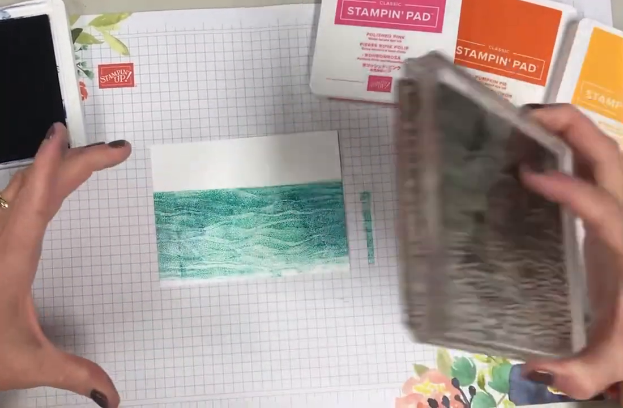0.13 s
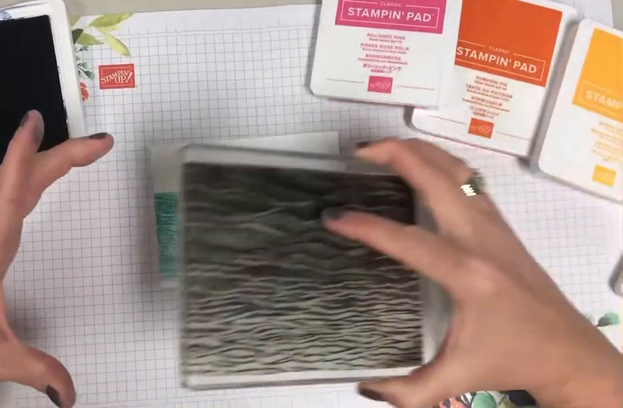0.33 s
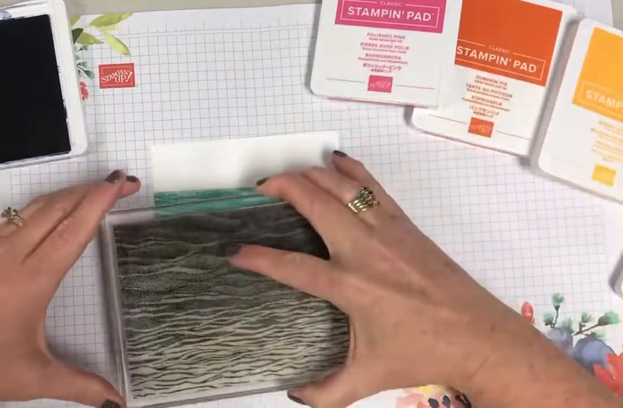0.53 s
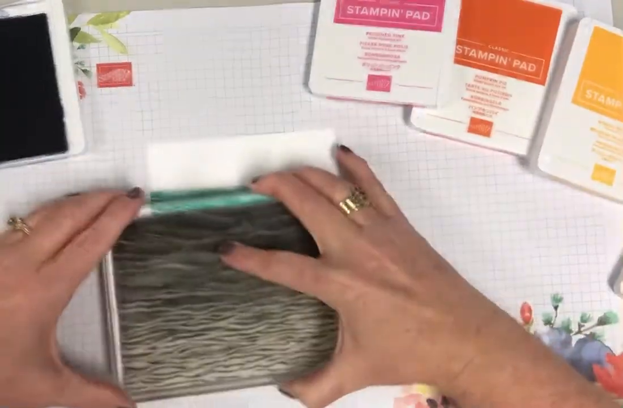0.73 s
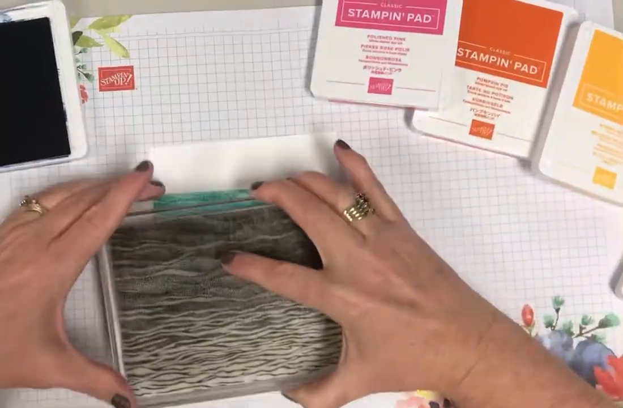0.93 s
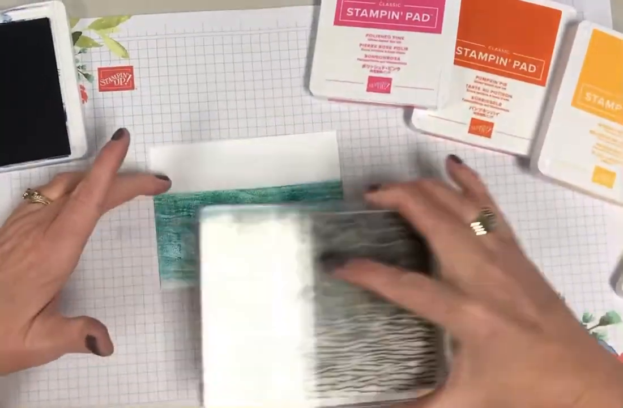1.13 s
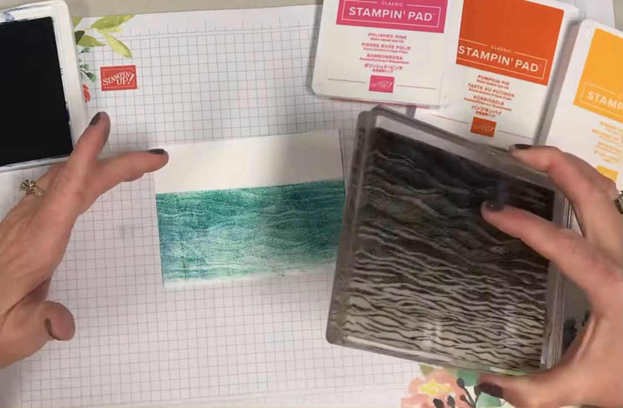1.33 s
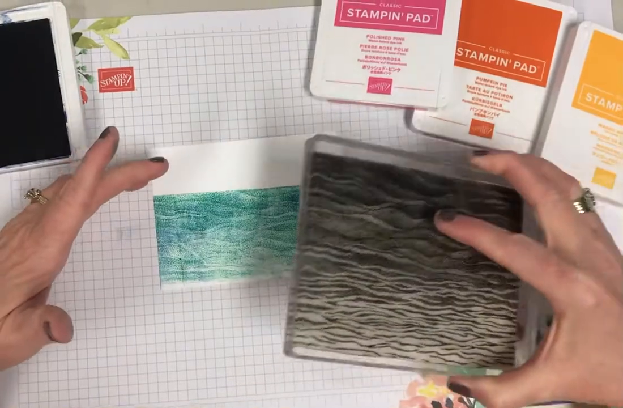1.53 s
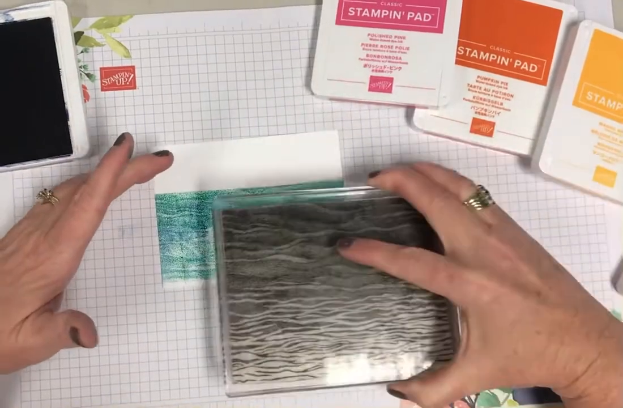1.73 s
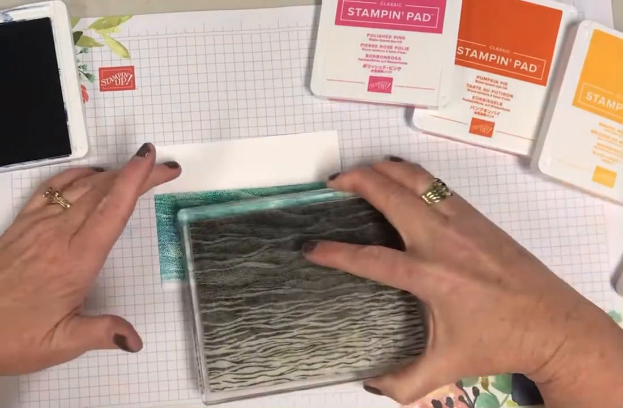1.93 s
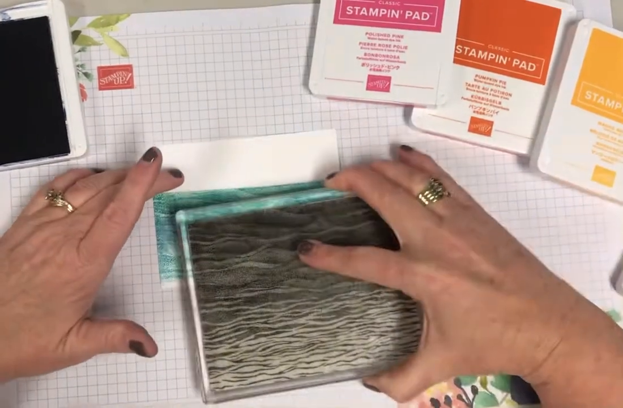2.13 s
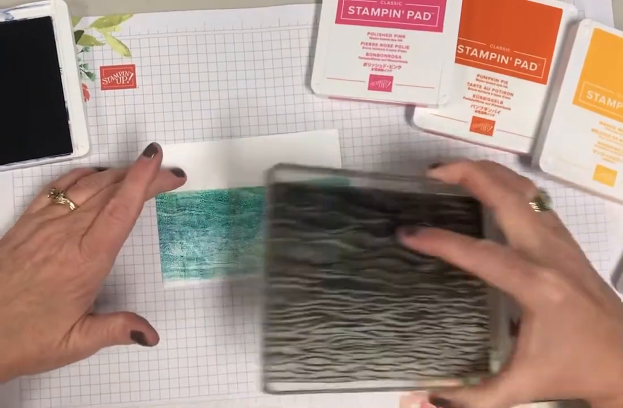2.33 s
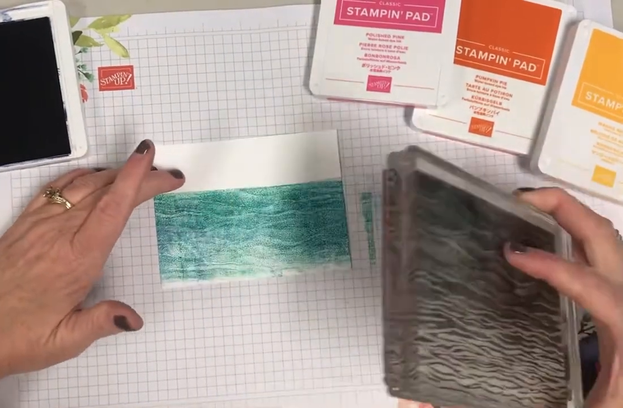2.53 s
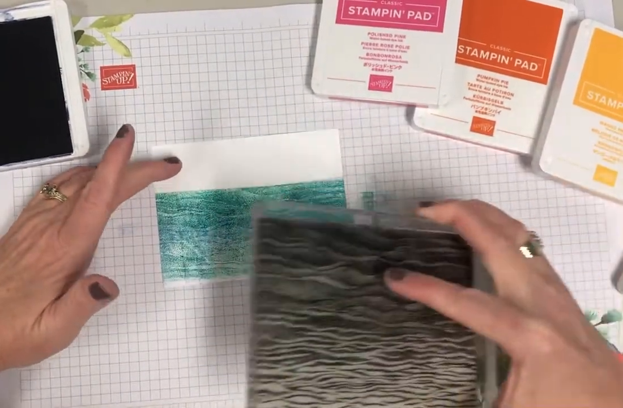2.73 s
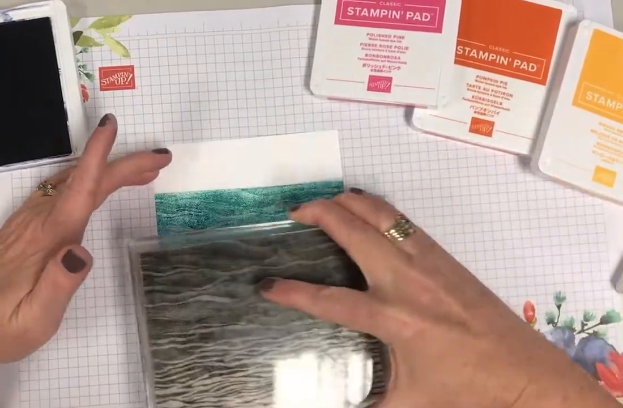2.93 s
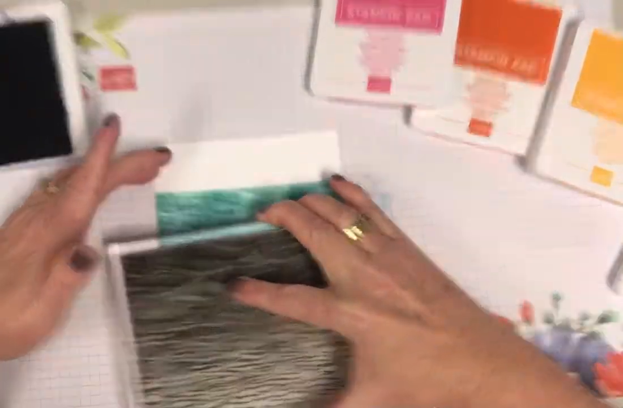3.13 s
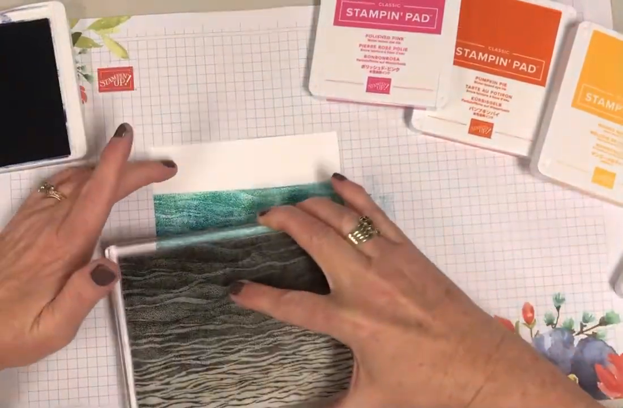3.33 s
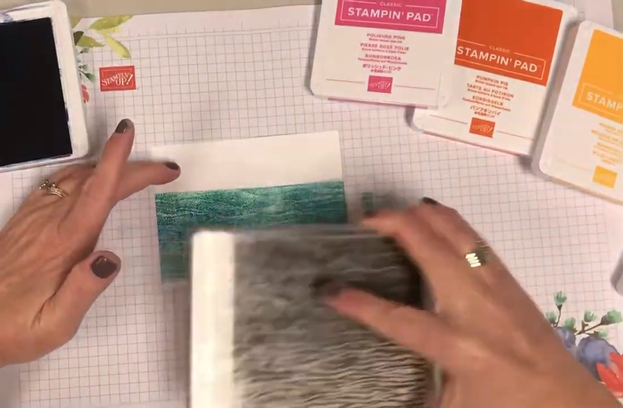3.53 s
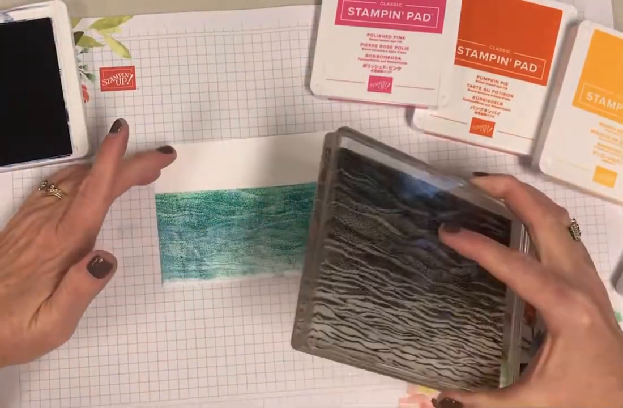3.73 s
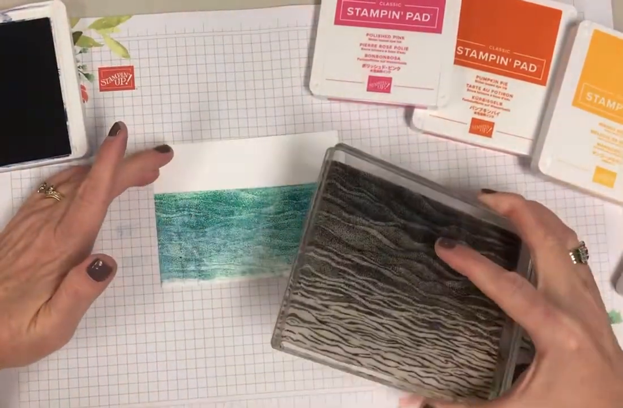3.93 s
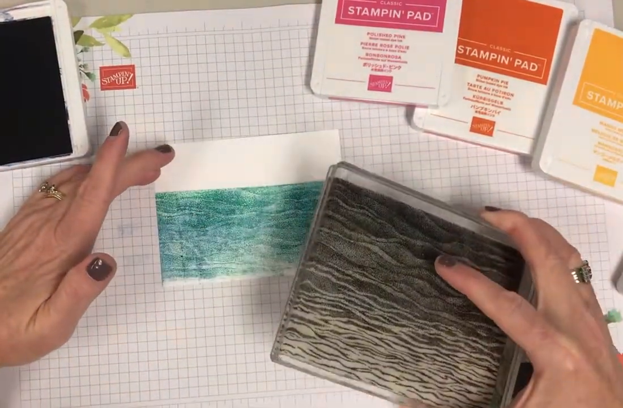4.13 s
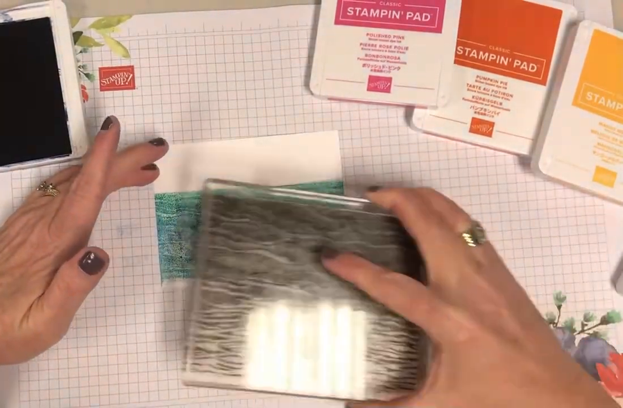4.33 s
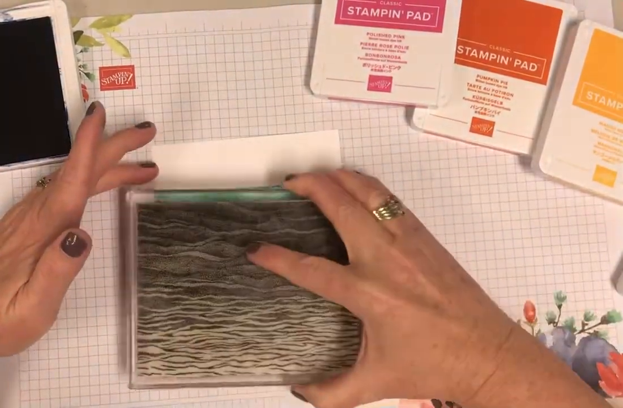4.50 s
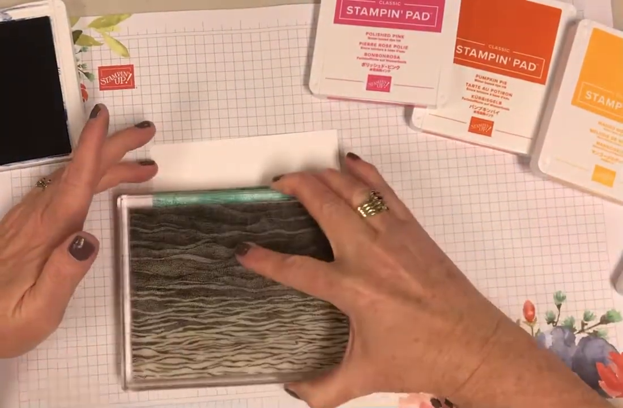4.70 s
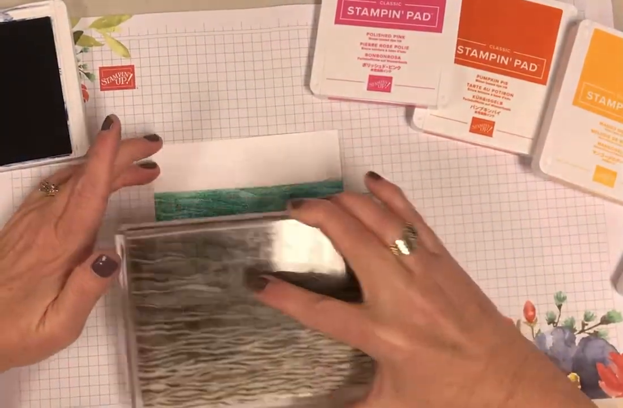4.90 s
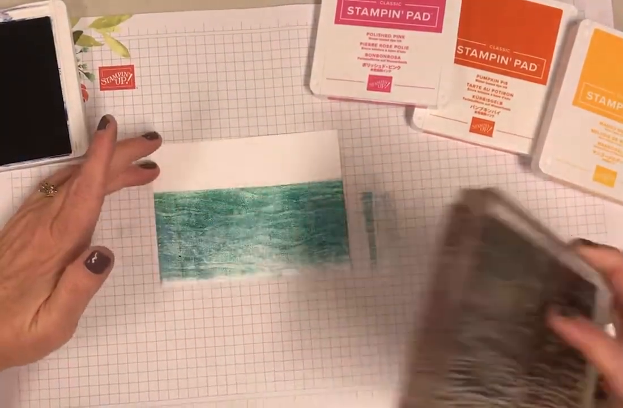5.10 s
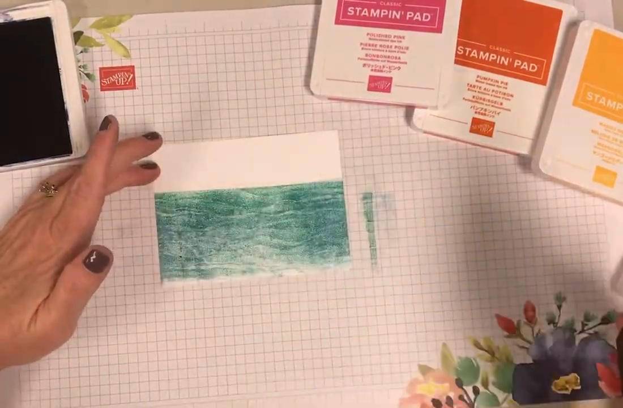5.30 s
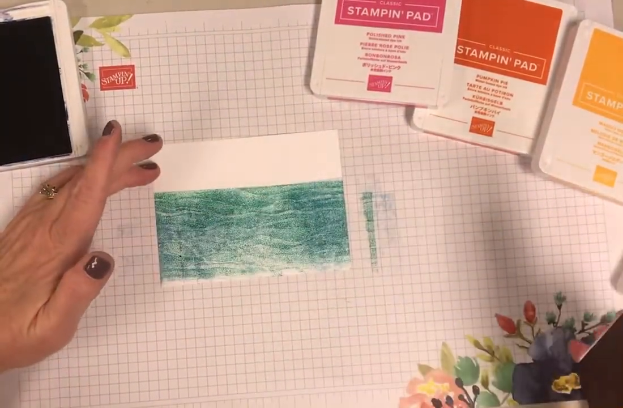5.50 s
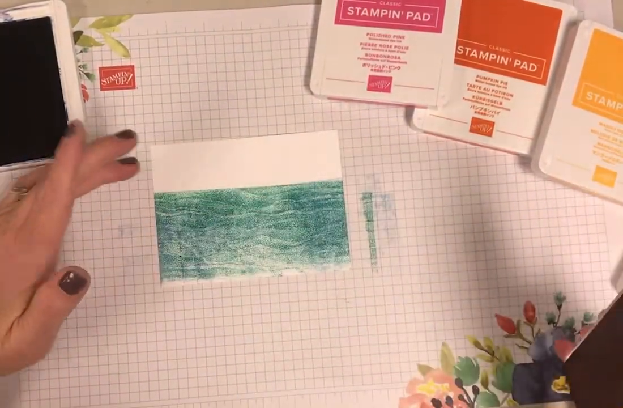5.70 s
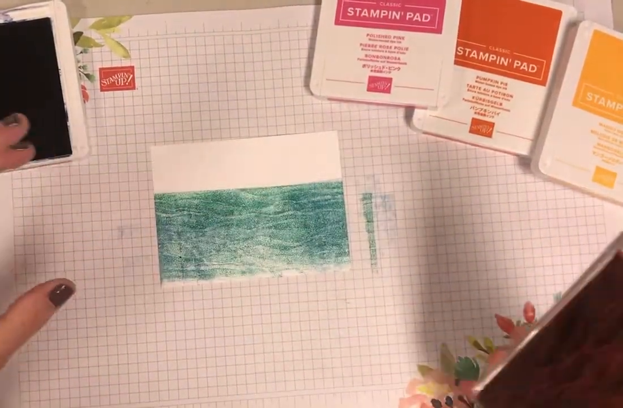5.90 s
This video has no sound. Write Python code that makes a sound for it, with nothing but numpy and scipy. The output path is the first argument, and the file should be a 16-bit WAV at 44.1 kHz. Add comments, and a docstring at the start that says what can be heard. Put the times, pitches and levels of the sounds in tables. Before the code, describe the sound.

A large acrylic block with a rubber stamp thuds onto paper on a craft table four times, with soft brushing and a final sharp click.

```python
"""A large acrylic block with a rubber stamp lands four times on paper on a crafting table, in a small room.
Each time an edge hits and the face comes down flat: soft pulses ring the tabletop's modes as a thud,
and grainy noise rings the block's modes as a clack. Hands and rubber brush the paper in swells of hiss with a
dull rumble below; damped modes make the block tick in the grip and, at the end, click sharply.
Quiet room air and a fading low drone lie underneath."""
import sys
import numpy as np
from scipy import signal
from scipy.fft import rfft, irfft, next_fast_len
from scipy.io import wavfile
from scipy.ndimage import map_coordinates

SR = 44100
rng = np.random.default_rng(int(sys.argv[2]) if len(sys.argv) > 2 else 0)


def unload_wav(signal):
    """Save mono or channel-first audio to the path in sys.argv[1] as 16-bit WAV at rate SR, clipped to [-1, 1]."""
    wavfile.write(
        sys.argv[1],
        SR,
        np.round(np.clip(np.atleast_2d(signal).T, -1, 1) * 32767).astype(np.int16),
    )


N = 267025
TIME = np.arange(N) / SR  # seconds

# room air: (frequency [Hz], relative density [dB per Hz])
AIR_SPECTRUM = [(20, -44), (33, -26), (45, -13.5), (62, 0.5), (88, -6), (138, -5), (204, -11.5), (328, -14),
                (500, -18.5), (800, -21.5), (1100, -18), (2000, -25), (5000, -30.7), (10500, -36),
                (15000, -35.5)]
# small hard ticks: (time [s], level [dB], lowest mode [Hz], brightness [dB per octave])
TICK_EVENTS = [(.2727, -48.5, 2940, 6.5), (2.5302, -42, 1290, -1), (4.617, -43, 1050, -9),
               (5.013, -47, 1030, -15), (5.931, -66, 3000, 11), (6.0078, -21, 3130, -1)]
# modes of a tick: (multiple of the lowest mode [ratio], Q [ratio], level [dB])
TICK_MODES = [(1, 10.5, -3.5), (1.35, 4.7, -2.5), (2.0, 4.6, -5), (2.8, 5.5, -8.5), (4.4, 6.9, -11)]
# hand and rubber slide over the paper: (time of the middle [s], level [dB], half length [s])
SLIDES = [(.387, -61, .13), (.89, -60, .085), (.99, -62, .025), (1.12, -59, .036), (1.19, -56.7, .12),
          (2.368, -65.3, .12), (3.5, -64, .11), (4.365, -68.7, .11), (4.96, -68.5, .072), (5.73, -73, .31)]
# sliding on paper: (frequency [Hz], relative density [dB per Hz])
PAPER_SPECTRUM = [(150, -22), (700, -1), (1800, -2.5), (3000, 4), (5000, -1), (7500, -5.5), (9500, -4),
                  (10400, -14), (12000, -3.5), (16000, -12.5)]
# low bumps with a short scuff: (time [s], bump level [dB], scuff level [dB])
BUMPS = [(.698, -40, -48), (.786, -48, -47.5), (.886, -60, -53.5), (.998, -49.5, -55), (1.944, -50, -58),
         (2.189, -50.5, -56), (2.531, -68, -67), (3.307, -50, -53), (4.79, -60, -58.5)]
# dull rumble of the tabletop: (frequency [Hz], relative density [dB per Hz])
RUMBLE_SPECTRUM = [(30, -17), (50, -4.5), (100, 1), (150, -4.5), (260, -7), (400, -9.5), (540, -19.5),
                   (900, -31.5), (2000, -54.5)]
# the block lands: (graze time [s], graze level [dB], edge hit time [s], edge level [dB],
# face flat time [s], face level [dB], rubber slap time [s], slap level [dB], slap rise [s], slap t60 [s])
LANDINGS = [(.659, -48.5, .6531, -26, .6839, -23.5, .686, -41.5, .016, .09),
            (1.961, -40.5, 1.9647, -11.5, 1.9852, -19, 1.984, -28, .009, .06),
            (3.110, -35, 3.1172, -7.8, 3.1362, -21.5, 3.1215, -21.7, .0008, .03),
            (4.583, -47.5, 4.5931, -31, 4.6172, -29, 4.601, -51.5, .005, .04)]
# modes of the tabletop: (frequency [Hz], width [Hz], level [dB])
TABLETOP_MODES = [(45, 9, -5.5), (94.5, 16, 5.5), (108.4, 9.2, -1.5), (153, 36, 0), (196.5, 12, -5.5),
                  (251, 10, -4.5), (296, 20, 0), (382.4, 14, -2.5), (540, 14, -4), (660, 34, -4)]
# rubber slapping on paper: (frequency [Hz], relative density [dB per Hz])
SLAP_SPECTRUM = [(60, -10), (250, 4), (470, 2.5), (800, 2.5), (1300, -2), (2100, -7), (3100, -7),
                 (4600, -14.5), (6000, -16), (7600, -25), (9500, -22.5), (10500, -31), (12000, -27),
                 (16000, -36.5)]
# modes of the acrylic block: (frequency [Hz], width [Hz], level [dB])
BLOCK_MODES = [(1018, 35, -7), (1195, 35, -6), (1398, 35, -6), (1680, 45, -3.5), (2760, 120, -4.5),
               (3000, 40, -5), (3195, 30, -1), (3360, 250, -7), (3900, 500, -14), (9160, 858, -11.5)]
# decay of the room: (frequency [Hz], t60 [s])
ROOM_DECAY = [(60, 0.536), (120, 0.66), (380, 0.57), (1000, 0.52), (3000, 0.61), (6000, 0.584),
              (12000, 0.73)]

DRONE_HZ, DRONE_DB = 49, -62
DRONE_FADE_START_S, DRONE_FADE_DB_PER_S = 2.3, 25
DRAG_DB = -7  # a slide also rumbles in the table; relative to its hiss
BUMP_LAG_S, BUMP_HALF_S = .012, .03  # a bump is a soft swell that peaks just after its scuff
RUMBLE_DB, RUMBLE_T60_S = -20, .62  # rumble that dies away after a landing; relative to the face
PUSH_HZ, PUSH_DB_PER_OCTAVE = 325, 26  # pitch of a 0 dB push, the face apart; softer ones are longer and lower
FACE_HZ = 68  # pitch of the push of the broad face
TABLE_PERIOD_S = .0112  # further low pushes, one table period before and after the face
BEFORE_DB, AFTER_DB = 2, .5  # those two pushes, relative to the face
CLACK_DB = -6  # a clack comes with the push before the face; relative to the slap
FLATTEN_DB, FLATTEN_DULL_DB = -9, -1.5  # ridges flatten under the face: relative to the slap, and dB per octave
AFTER_HISS_LAG_S, AFTER_HISS_DB = .075, -24.5  # a faint bright hiss swells shortly after the slap; relative to it
TOP_HZ = 15850  # band limit of the microphone


def amp(db):
    """Decibels to gain."""
    return 10 ** (np.asarray(db) / 20)


def unit(x):
    """Scale to rms 1."""
    return x / np.sqrt(np.mean(x ** 2) + 1e-20)


def along(points, hz):
    """Read a curve of (Hz, value) points on a log frequency axis."""
    f, values = np.transpose(points)
    return np.interp(np.log(hz + 1), np.log(f + 1), values)


def filtered(x, response):
    """Shape x with a complex response of frequency."""
    size = next_fast_len(N + SR // 4, real=True)
    spectrum = rfft(x, size) * response(np.fft.rfftfreq(size, 1 / SR))
    return irfft(spectrum, size)[:N]


def resonances(modes, f):
    """Causal response of a body that rings in (Hz, width Hz, dB) modes."""
    total = 0
    for hz, width, db in modes:
        damping = 1j * f * width
        total = total + amp(db) * damping / (hz * hz - f * f + damping)
    return total


def noise(spectrum):
    """Coloured noise of rms 1."""
    white = rng.standard_normal(N)
    return unit(filtered(white, lambda f: amp(along(spectrum, f))))


def wobble(rate):
    """A smooth random curve with rate knots a second."""
    knots = rng.standard_normal(int(N * rate / SR) + 4)
    return map_coordinates(knots, [TIME * rate])


def swells(rows):
    """Smooth rises and falls of gain from (s, dB, half length s) rows, summed as power."""
    power = 0
    for s, db, half in rows:
        power = power + amp(db) ** 2 * np.exp(-np.minimum(2 * ((TIME - s) / half) ** 2, 20))
    return np.sqrt(power)


def background():
    """Quiet room air, never quite steady, with a low drone that fades away."""
    air = amp(-64.5 + 0.23 * wobble(5.9)) * noise(AIR_SPECTRUM)
    drone = np.sqrt(2) * np.sin(2 * np.pi * DRONE_HZ * TIME + .3 * wobble(18))
    drone_db = DRONE_DB - DRONE_FADE_DB_PER_S * np.maximum(TIME - DRONE_FADE_START_S, 0)
    return air + amp(drone_db) * drone


def ticks(rebound_cycles=5, rebound_db=-6):
    """A hard contact rings for a few cycles, damped by the hand, and chatters once in step with its lowest mode."""
    out = np.zeros(N + SR)
    t = np.arange(SR // 30) / SR
    for s, db, hz, brightness in TICK_EVENTS:
        # little radiates below the lowest mode
        below_modes = signal.butter(6, .85 * hz, "high", fs=SR, output="sos")
        for lag, loss_db in [(0, 0), (rebound_cycles, rebound_db)]:
            cycles = np.maximum(hz * t - lag, 0)
            ring = np.zeros(len(t))
            for multiple, q, level in TICK_MODES:
                decay = np.exp(-np.pi * multiple * cycles / q)
                gain = amp(level + brightness * np.log2(multiple))
                ring += gain * np.sin(2 * np.pi * multiple * cycles) * decay
            out[round(s * SR):][:len(t)] += amp(db + loss_db) * signal.sosfilt(below_modes, ring)
    return out[:N]


def brushing(flutter_db=1.4):
    """Skin and rubber slide over the paper with a soft, fluttering hiss that swells and fades with their speed."""
    return swells(SLIDES) * amp(flutter_db * wobble(60)) * noise(PAPER_SPECTRUM)


def rumbling(rise=.012):
    """The tabletop rumbles dully after landings, at bumps and along slides: low noise under smooth envelopes."""
    bumps = swells([(s + BUMP_LAG_S, bump_db, BUMP_HALF_S) for s, bump_db, _ in BUMPS])
    force = np.hypot(bumps, amp(DRAG_DB) * swells(SLIDES))
    for _, _, _, _, face_s, face_db, *_ in LANDINGS:
        t = TIME - face_s
        after_db = face_db + RUMBLE_DB - 60 * np.maximum(t, 0) / RUMBLE_T60_S
        after_landing = amp(after_db) * np.exp(np.minimum(t, 0) / rise)
        force = np.hypot(force, after_landing)
    return force * noise(RUMBLE_SPECTRUM)


def blows():
    """The edge hit, then the face with a low push before and after it: rows of (s, dB, pitch of the push Hz)."""
    for _, _, edge_s, edge_db, face_s, face_db, *_ in LANDINGS:
        edge = (edge_s, edge_db)
        before_face = (face_s - TABLE_PERIOD_S, face_db + BEFORE_DB)
        after_face = (face_s + TABLE_PERIOD_S, face_db + AFTER_DB)
        for s, db in [edge, before_face, after_face]:
            yield s, db, PUSH_HZ * 2 ** (db / PUSH_DB_PER_OCTAVE)
        yield face_s, face_db, FACE_HZ


def thuds():
    """Each cushioned blow pushes the air out and back once, and sets the tabletop ringing."""
    push = np.zeros(N)
    for s, db, hz in blows():
        phase = 2 * np.pi * hz * (TIME - s)
        near = np.abs(phase) < 2 * np.pi
        push[near] -= amp(db) * phase[near] * np.exp((1 - phase[near] ** 2) / 2)
    ringing = filtered(push, lambda f: resonances(TABLETOP_MODES, f))
    return amp(-5) * push + ringing


def touch(grains, s, db, rise, t60, bright_db, tilt_hz=1500):
    """One burst of contact noise: the grains swell and die away, tilted by bright_db per octave."""
    out = np.zeros(N)
    near = slice(round((s - .15) * SR), round((s + .15) * SR))
    t = TIME[near] - s
    force = amp(db - 60 * np.maximum(t, 0) / t60) * np.exp(np.minimum(t, 0) / rise)
    size = next_fast_len(len(t))
    octaves = np.log2(np.fft.rfftfreq(size, 1 / SR) / tilt_hz + .1)  # the offset limits the tilt in the bass
    tilted = irfft(rfft(grains[near], size) * amp(bright_db * octaves), size)
    out[near] = force * tilted[:len(t)]
    return out


def slaps(grain_db=3.5):
    """Rubber meets paper in crowds of tiny contacts, drawn as grainy noise, that ring the block's modes."""
    contacts = np.zeros(N)
    grains = unit(noise(SLAP_SPECTRUM) * amp(grain_db * wobble(700)))
    for graze_s, graze_db, _, _, face_s, _, slap_s, slap_db, rise, t60 in LANDINGS:
        # bright grazing touch near the edge hit
        contacts += touch(grains, graze_s, graze_db, rise=.001, t60=.07, bright_db=4)
        contacts += touch(grains, face_s - TABLE_PERIOD_S, slap_db + CLACK_DB, rise=.003, t60=.02, bright_db=1)
        contacts += touch(grains, slap_s, slap_db, rise, t60, bright_db=.4)
        contacts += touch(grains, face_s, slap_db + FLATTEN_DB, rise=.006, t60=.1, bright_db=FLATTEN_DULL_DB)
        hiss_s, hiss_db = slap_s + AFTER_HISS_LAG_S, slap_db + AFTER_HISS_DB
        contacts += touch(grains, hiss_s, hiss_db, rise=.03, t60=.12, bright_db=4)
    for s, _, scuff_db in BUMPS:
        contacts += touch(grains, s, scuff_db, rise=.003, t60=.04, bright_db=3)
    return amp(-4) * filtered(contacts, lambda f: 1 + resonances(BLOCK_MODES, f))


def room(x, near_db, tail_db, near_t60=0.11, delay=.014, scatter_hz=450):
    """Small things on the table scatter the treble at once; the walls follow, differently for each landing."""
    out = np.zeros(N)
    small_things = signal.butter(2, scatter_hz, "high", fs=SR, output="sos")
    for part in np.array_split(np.arange(N), 4):  # each quarter holds one landing
        # the walls: noise that dies away at its own pace in each band
        hz, t, bands = signal.stft(rng.standard_normal(SR // 2), SR, nperseg=256)
        decay = amp(-60 * t / along(ROOM_DECAY, hz)[:, None])
        tail = signal.istft(bands * decay, SR, nperseg=256)[1]
        t = np.arange(len(tail)) / SR
        tail *= 1 - np.exp(-(t / delay) ** 2)
        near = signal.sosfilt(small_things, rng.standard_normal(len(t)) * amp(-60 * t / near_t60))
        answer = amp(near_db) * near / np.linalg.norm(near) + amp(tail_db) * tail / np.linalg.norm(tail)
        wet = signal.fftconvolve(x[part], answer)[:N - part[0]]
        out[part[0]:][:len(wet)] += wet
    return out


def clatter(count=3):
    """The block sends different detail in each direction, so the room answers it evenly."""
    answers = sum(room(slaps(), near_db=-13.5, tail_db=-9.5) for _ in range(count))
    return slaps() + answers / np.sqrt(count)


def scene():
    """The close sounds in their room, over the background."""
    table, clicks = thuds(), ticks()
    table = table + room(table, near_db=-13, tail_db=-12.5)
    clicks = clicks + room(clicks, near_db=-28, tail_db=-18.5)
    return (table + clatter() + clicks + rumbling() + brushing() + background())[None]


def record(dry):
    """The microphone drops the deepest bass and keeps nothing above its band limit."""
    low_cut = signal.butter(4, 35, "high", fs=SR, output="sos")
    return filtered(signal.sosfilt(low_cut, dry[0]), lambda f: f < TOP_HZ)[None]


dry = scene()
out = record(dry)
unload_wav(out)
```